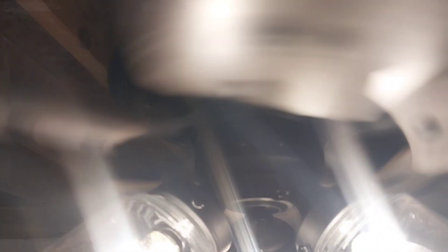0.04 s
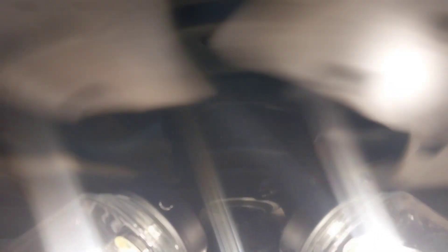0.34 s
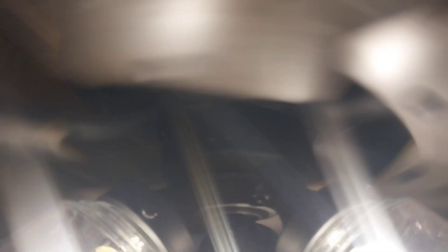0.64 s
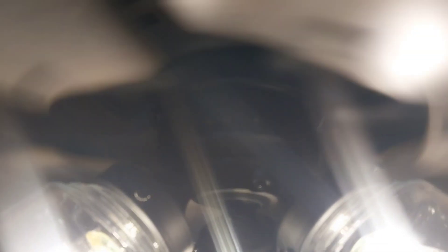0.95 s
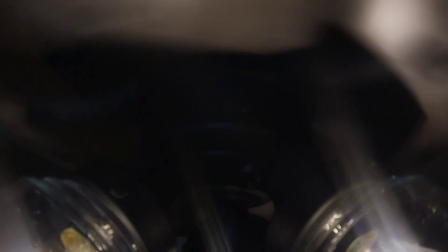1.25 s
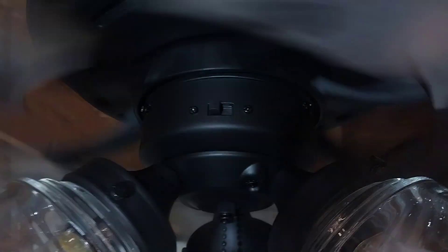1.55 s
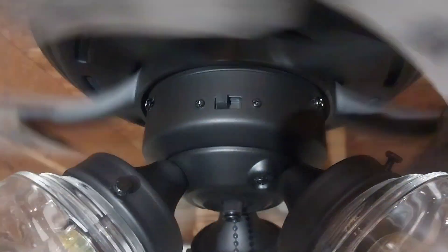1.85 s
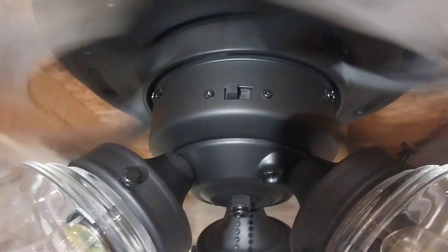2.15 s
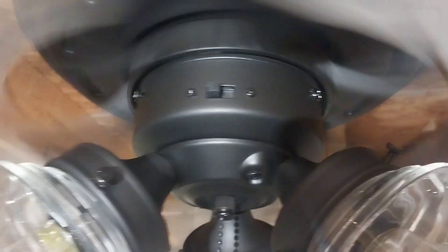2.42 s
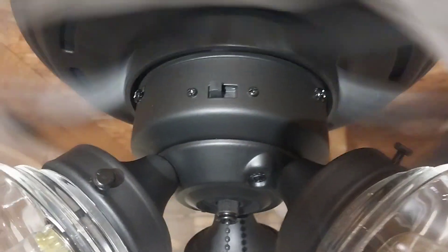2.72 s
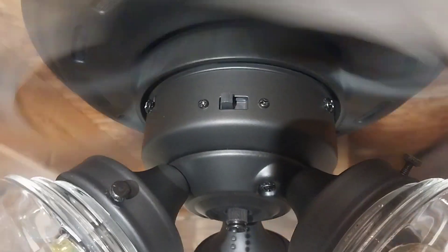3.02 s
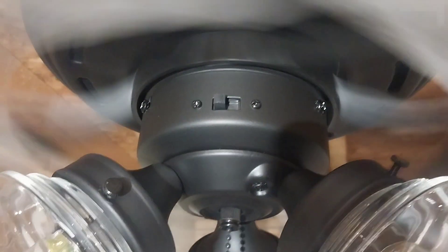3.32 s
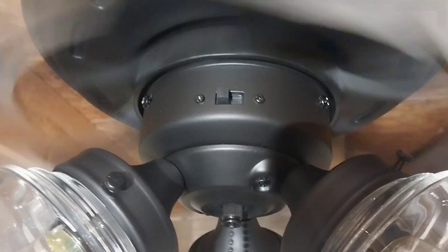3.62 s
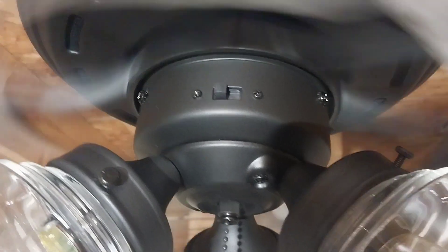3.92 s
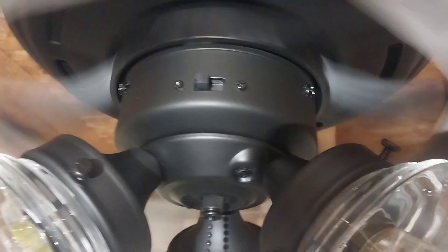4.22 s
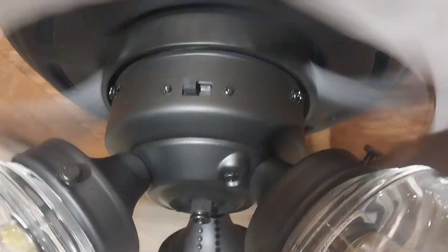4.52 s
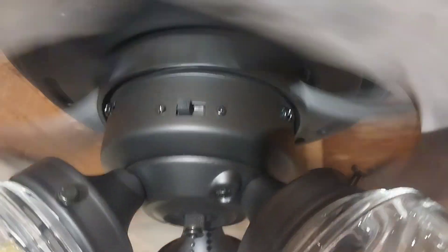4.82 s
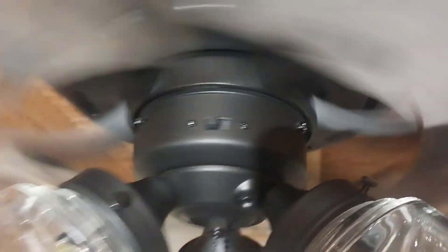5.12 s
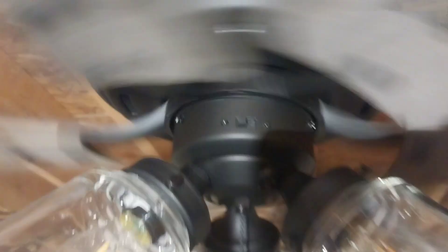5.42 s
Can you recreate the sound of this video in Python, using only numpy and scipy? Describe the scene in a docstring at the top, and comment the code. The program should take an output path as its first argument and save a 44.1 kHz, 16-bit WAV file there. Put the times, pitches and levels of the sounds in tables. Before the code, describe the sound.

A ceiling fan whooshes softly close by while its pull chains snap: two sharp clicks, then six evenly spaced ones.

```python
"""A small wooden room, a ceiling fan turning just above a hand-held microphone. The blades swish once a
turn while gusts buffet the ports. One pull-chain switch snaps the lamps off and on; a second chain is
pulled six times, each pull ticking and catching before it snaps, and the blades begin to slow. Beads
scrape and jingle, the metal housing rings faintly, and the room answers the switches. Underneath lie
a thin motor whine, a steady hiss and, at the start, a few bumps and a rustle of the hand."""
import sys
import numpy as np
from scipy import signal
from scipy.fft import rfft, irfft, next_fast_len
from scipy.io import wavfile
from scipy.ndimage import uniform_filter1d

SR = 44100
rng = np.random.default_rng(int(sys.argv[2]) if len(sys.argv) > 2 else 0)


def unload_wav(signal):
    """Save mono or channel-first audio to the path in sys.argv[1] as 16-bit WAV at rate SR, clipped to [-1, 1]."""
    wavfile.write(
        sys.argv[1],
        SR,
        np.round(np.clip(np.atleast_2d(signal).T, -1, 1) * 32767).astype(np.int16),
    )


N = 249606
TIME = np.arange(N) / SR
FFT_SIZE = next_fast_len(N, real=True)
COAST_S = 3.5  # just after the second pull, the whine is gone and the blades start to slow

# strength of the downdraught at the microphone: time_s, level_db
DOWNDRAUGHT = [(0.0, -49), (0.69, -56), (1.09, -53.5), (1.78, -57), (2.11, -55.5), (4.54, -60.5),
               (4.73, -64.5), (5.01, -63), (5.23, -65.5), (5.66, -59.5)]
# the strongest gusts: peak_s, length_s, thump_db, whoosh_db
GUSTS = [(0.026, 0.031, -35, -42.5), (0.162, 0.045, -39.5, -62), (0.217, 0.056, -41, -59.5),
         (0.564, 0.064, -47, -48), (1.16, 0.081, -47, -54.5), (1.334, 0.059, -48.5, -47),
         (1.445, 0.054, -48.5, -61), (2.097, 0.078, -41, -50), (2.243, 0.045, -57, -58),
         (2.575, 0.033, -42.5, -59.5), (2.645, 0.087, -50.5, -51), (3.205, .11, -45, -46),
         (3.304, 0.061, -50.5, -69), (3.796, 0.056, -50.5, -47), (4.07, 0.052, -58, -74),
         (4.469, 0.051, -48, -56.5), (4.866, 0.067, -45.5, -58.5), (5.029, 0.063, -52, -61.5),
         (5.65, 0.094, -47.5, -54.5)]
# four bands of moving air, from rumble up to sizzle: frequency_hz, density_db
BUFFET_COLOUR = [(15, -24.5), (30, -14.5), (45, -1.5), (60, 4.5), (80, -2.5), (103, 3.5), (135, -5),
                 (190, -17), (400, -46), (900, -80)]
WHOOSH_COLOUR = [(70, -35.5), (125, -7), (160, -2), (197, 3), (250, -2), (300, -6), (370, -16), (450, -20),
                 (650, -30), (1500, -84)]
RUSH_COLOUR = [(200, -31.5), (350, -4), (450, 3), (550, -4.5), (700, -15), (900, -17.5), (1500, -38),
               (4000, -52.5)]
SIZZLE_COLOUR = [(300, -5), (900, -0.5), (1400, 0), (2200, -3.5), (3800, -12.5), (5200, -4.5), (6600, 3.5),
                 (7300, -14), (8400, -21.5), (10000, -13.5), (12800, -9), (15700, -14)]
# how alike the two microphone ports sound: frequency_hz, correlation
PORT_LIKENESS = [(30, .24), (60, .24), (125, .43), (250, .58), (600, .55), (2000, .25), (8000, .1)]

# snaps of the two switches: time_s, level_db, decay_s, brightness_db, knock_db, pitch_hz
SPEED_SNAPS = [(3.1774, -15.5, .0032, 4, -1, 6390), (3.4509, -16.5, 0.0036, 1, 6, 6600),
               (3.7567, -19.5, 0.0059, 6.5, 3.5, 6920), (4.0169, -13, 0.0021, -3, 3, 5690),
               (4.301, -18.5, 0.0041, 0, -.5, 6400), (4.5666, -17.5, 0.0058, 1.5, 3.5, 5600)]
LAMP_SNAPS = [(1.2840, -53, 0.0042, -16, 2.5, 6700), (1.3145, -54.5, 0.0099, -4, 0, 6500),
              (1.3262, -7, 0.0033, 4.5, -4, 6350), (1.5395, -21, 0.0028, -1, 7, 6700)]
# the pawl's light tick and the firmer catch ahead of each speed snap: time_s, level_db
PAWL_TICKS = [(3.1248, -49.5), (3.3667, -41), (3.7127, -42.5), (3.9364, -43.5), (4.2611, -37),
              (4.4785, -40)]
CATCHES = [(3.162, -36.5), (3.4225, -32.5), (3.746, -37), (3.9929, -33.5), (4.290, -33.5), (4.5335, -32.5)]
# two alternating strokes, one grinding into a hollow catch, one crisp; the scrape, then the catch:
# start_before_snap_s, end_before_snap_s, scrape_db, rise_s, decay_s, brightness_db, knock_db
STROKES = [(0.076, 0.011, -69.5, .0028, .0065, 4, 12.5), (0.066, .025, -61, .0005, .0035, 1.5, 0)]
# tone of each switch's contacts: frequency_hz, density_db
SPEED_COLOUR = [(400, -27), (800, -20.5), (1250, -14), (1700, -21.5), (2400, -17.5), (3500, -18),
                (4400, -10), (6500, -0.5), (7300, -7), (8200, -19.5), (9400, -12), (10300, -5), (12200, 2),
                (15600, -8.5)]
LAMP_COLOUR = [(200, -31), (600, -24.5), (1050, -17), (1800, -29.5), (2650, -22.5), (3900, -24),
               (5400, -9.5), (6600, -4.5), (7900, -16), (9200, -7), (10000, -2), (11500, 1.5), (13200, 2.5),
               (15800, -14)]
# hollow modes of each switch body: pitch_hz, level_db, t60_s
SPEED_BODY = [(815, -10.5, 0.042), (1106, -5.5, 0.029), (1261, -11, 0.086), (2467, -10.5, 0.051),
              (2930, -13.5, 0.011)]
LAMP_BODY = [(704, -3, 0.05), (1048.6, 4.5, 0.038), (2580, -4, .018)]
# the pendant jingles as the chain is let go: start_s, level_db, t60_s
JINGLES = [(4.020, -42.5, 0.38), (4.0846, -30.5, 0.023), (4.570, -44.5, 0.2)]
# metal resonances of the chain's pendant and the motor's shell: pitch_hz, half_width_hz, level_db
PENDANT_RESONANCES = [(5710, 170, 11), (6600, 300, -8)]
HOUSING_RESONANCES = [(1460, 30, 3.5)]

# tone of the first reflections: frequency_hz, level_db
SCATTER_COLOUR = [(500, 10), (1200, 1.5), (3000, 5), (6000, -4.5), (9000, -8), (11500, -4.5), (14500, -7.5)]
# length of the room's tail: frequency_hz, t60_s
ROOM_T60 = [(200, .45), (1400, 0.58), (3000, 0.59), (6000, 0.52), (9000, 0.26), (12000, 0.33),
            (16000, 0.33)]
# soft bumps of the hand: time_s, level_db, decay_s
BUMPS = [(.069, -46, 0.0045), (0.148, -33, 0.0028), (0.310, -34.5, 0.0052)]
# the hard click of the first two bumps, then a few faint, dry ticks:
# time_s, level_db, decay_s, brightness_db, knock_db, pitch_hz
DRY_CLICKS = [(.0685, -47, 0.0012, -2, 24.5, 6400), (.1482, -48, 0.00081, 6, 20, 6396),
              (2.882, -58.5, 0.0013, -1, -6, 6400), (2.9545, -55.5, 0.0027, -16.5, -7, 5900),
              (5.378, -64.5, 0.0014, -18.5, 6.5, 5000)]
# fingers sliding on the microphone's case: time_s, level_db
RUSTLE_ENVELOPE = [(0, -88), (.08, -74.5), (.25, -75), (.36, -75), (.45, -100), (.5, -130)]
# tone of the bumps, the fingers and the microphone's hiss: frequency_hz, density_db
BUMP_COLOUR = [(80, -11.5), (250, -10), (400, -2), (600, -15), (900, -44), (2500, -54), (8000, -62)]
RUSTLE_COLOUR = [(800, -15), (3500, -19), (4900, -0.5), (5800, -8.5), (8000, -23.5), (13000, -13),
                 (16000, -24)]
HISS_COLOUR = [(200, 9.5), (1000, 8), (3500, -4), (6500, -1.5), (8300, -10), (10000, -3), (12800, 4.5),
               (15700, -3.5)]


def fan():
    """Eddies thump the ports; the blades whoosh and sizzle, all fluttering with the same turbulence."""
    eddies, lumps, swell = wander(rate_hz=190), wander(rate_hz=12), blade_swish()
    thump, puff = gusts()
    buffeting = airflow(swell, db=-57.5, follows=0.63, swish_db=0) * amp(2.2 * lumps)
    whooshing = airflow(swell, db=-56.5, follows=0.82, swish_db=2.5) * amp(0.96 * lumps)
    rushing = airflow(swell, db=-75, follows=2, swish_db=2)
    sizzling = airflow(swell, db=-86, follows=1.27, swish_db=9)
    buffet = stereo_noise(BUFFET_COLOUR) * np.hypot(buffeting, thump) * amp(1.4 * eddies)
    whoosh = stereo_noise(WHOOSH_COLOUR) * np.hypot(whooshing, puff) * amp(1.1 * eddies)
    rush = stereo_noise(RUSH_COLOUR) * rushing * amp(1.2 * eddies)
    sizzle = stereo_noise(SIZZLE_COLOUR) * sizzling * amp(0.21 * eddies)
    return buffet + whoosh + rush + sizzle


def blade_swish(turn_hz=2.55, first_swish_s=0.16, slowing_hz_per_s=0.25, sharpness=3):
    """A swell from zero to one and back each turn, spreading out as the blades coast."""
    speed_hz = turn_hz - slowing_hz_per_s * np.maximum(TIME - COAST_S, 0)
    turns = np.cumsum(speed_hz) / SR - turn_hz * first_swish_s
    return abs(np.cos(np.pi * turns)) ** sharpness


def airflow(swell, db, follows, swish_db):
    """Fader for one band of air: it rides the downdraught and lifts by swish_db on each swish."""
    draught_db = np.interp(TIME, *np.transpose(DOWNDRAUGHT))
    return amp(db + follows * (draught_db - draught_db.mean()) + swish_db * swell)


def gusts():
    """Each gust swells and fades in a bell curve; gives the envelopes of thump and whoosh."""
    out = np.zeros((2, N))
    for peak_s, length_s, thump_db, whoosh_db in GUSTS:
        near = abs(TIME - peak_s) < 2 * length_s
        bell = np.exp(-(2 * (TIME[near] - peak_s) / length_s) ** 2)
        out[:, near] += amp([[thump_db], [whoosh_db]]) * bell
    return out


def speed_switch(tick_decay_s=0.004, tick_bright_db=-8, tick_knock_db=-4.5, pawl_hz=6250):
    """Each pull ticks the pawl, catches, then snaps."""
    switch = SPEED_COLOUR, SPEED_BODY
    ticks = [(s, db, tick_decay_s, tick_bright_db, tick_knock_db, pawl_hz) for s, db in PAWL_TICKS]
    out = clicks(ticks, *switch, body_db=-28.5, rise_s=0.0005, likeness=0.14, catch_db=6)
    for kind, (*_, rise_s, decay_s, bright_db, knock_db) in enumerate(STROKES):
        catches = [(s, db, decay_s, bright_db, knock_db, pawl_hz)
                   for s, db in CATCHES[kind::len(STROKES)]]
        out += clicks(catches, *switch, body_db=-24.5, rise_s=rise_s, likeness=0.14, catch_db=7)
    return out + clicks(SPEED_SNAPS, *switch, body_db=-25, rise_s=0.00084, likeness=0.2, catch_db=8)


def lamp_switch():
    """Two faint ticks lead into a hard snap off, then a lighter snap on."""
    return clicks(LAMP_SNAPS, LAMP_COLOUR, LAMP_BODY,
                  body_db=-33, rise_s=0.0003, likeness=0.22, catch_db=2.5)


def clicks(rows, colour, body, body_db, rise_s, likeness, catch_db):
    """Each click layers a short rattle of contacts over a hollow clack."""
    out = np.zeros((2, N))
    for s, db, decay_s, bright_db, knock_db, catch_hz in rows:
        contacts = rattle(colour, decay_s, rise_s, likeness, bright_db, knock_db, catch_hz, catch_db)
        add(out, s - 0.01, amp(db) * contacts)
        add(out, s, amp(db + knock_db + body_db) * clack(body))
    return out


def rattle(colour, decay_s, rise_s, likeness, bright_db=0, knock_db=0, catch_hz=6400, catch_db=0):
    """A tight burst of contact noise, coloured by the body it strikes; it crests 10 ms in."""
    size = 4096
    t = np.arange(size) / SR - 0.01
    envelope = np.exp(np.minimum(t / rise_s, -t / decay_s))
    shared, *sides = rng.standard_normal((3, size))
    contacts = envelope * (np.sqrt(likeness) * shared + np.sqrt(1 - likeness) * np.array(sides))
    hz = abs(np.fft.fftfreq(size, 1 / SR))
    top = (1 + np.tanh((hz - 8500) / 1500)) / 2  # a sharper contact feeds the upper resonances
    low = 1 / (1 + (hz / 3200) ** 4)  # a heavier one knocks on the hollow switch cup
    catch = np.exp(-((hz - catch_hz) / 520) ** 2)  # the spring catch has a pitch of its own
    gain = amp(read_curve(colour, hz) + bright_db * top + knock_db * low + catch_db * catch)
    body = np.exp(np.conj(signal.hilbert(np.log(gain))))  # minimum phase keeps the attack crisp
    struck = np.fft.ifft(np.fft.fft(contacts) * body).real
    return unit_rms(struck) * np.sqrt(np.mean(envelope ** 2))


def clack(body, spread_db=2, detune=0.023, attack_s=0.0007):
    """A blow rings the hollow switch body, a little differently each time."""
    t = np.arange(6000) / SR
    modes = np.zeros((1, len(t)))
    for hz, db, t60_s in body:
        louder, sharper = rng.standard_normal(2)
        tone = np.sin(2 * np.pi * hz * (1 + detune * sharper) * t)
        modes += amp(db + spread_db * louder) * die_away(t, t60_s) * tone
    return modes * (1 - np.exp(-t / attack_s))


def bead_chain():
    """The beads scrape through their eyelet on each pull; now and then the pendant jingles."""
    jingles, pulling = np.zeros((2, N)), np.zeros(N)
    for s, db, t60_s in JINGLES:
        add(jingles, s, amp(db) * metal_ring(PENDANT_RESONANCES, t60_s))
    for pull, (snap_s, *_) in enumerate(SPEED_SNAPS):
        start_before_s, end_before_s, db, *_ = STROKES[pull % len(STROKES)]
        pulling += amp(db) * ((TIME > snap_s - start_before_s) & (TIME < snap_s - end_before_s))
    scraping = uniform_filter1d(pulling, size=600) * amp(2.7 * wander(rate_hz=150))
    return jingles + scraping * unit_rms(stereo_noise(SPEED_COLOUR))


def housing(send_db=-50):
    """Every snap of the speed switch sets the motor's metal shell ringing faintly."""
    out = np.zeros((2, N))
    for s, snap_db, *_ in SPEED_SNAPS:
        add(out, s, amp(snap_db + send_db) * metal_ring(HOUSING_RESONANCES, t60_s=0.64))
    return out


def metal_ring(resonances, t60_s, attack_s=0.003, size=32768):
    """Clusters of close metal modes beat against each other as they die."""
    hz, t = np.fft.rfftfreq(size, 1 / SR), np.arange(size) / SR
    gain = sum(amp(db) / (1 + ((hz - centre) / width) ** 2) for centre, width, db in resonances)
    phases = np.exp(2j * np.pi * rng.random((2, len(hz))))
    return unit_rms(irfft(gain * phases)) * die_away(t, t60_s) * (1 - np.exp(-t / attack_s))


def room(sound, early_db, early_t60_s, late_db, build_s=0.008, size=32768):
    """Quick scatter from lamp shades, blades and ceiling, then the longer tail of the room."""
    hz, t, (early, late) = signal.stft(rng.standard_normal((2, 2, size)), SR, nperseg=256)
    scatter_tone = amp(early_db + read_curve(SCATTER_COLOUR, hz)[:, None])
    scatter = scatter_tone * die_away(t, early_t60_s) / np.sqrt(early_t60_s)
    tail = amp(late_db) * die_away(t, read_curve(ROOM_T60, hz)[:, None])
    reflections = signal.istft(early * scatter + late * tail, SR, nperseg=256)[1][:, :size]
    fade_in = np.clip(np.arange(size) / SR / build_s, 0, 1) ** 2
    response = reflections * fade_in * np.sqrt(2 * np.log(1000) / SR)
    return signal.fftconvolve(sound, response, axes=1)[:, :N]


def hand_bumps(shudder_db=-17.5, shudder_s=0.017):
    """Dull bumps of the hand on the microphone's case, which shudders on after each."""
    bumps, shudder = np.zeros((2, N)), np.zeros(N)
    for s, db, decay_s in BUMPS:
        add(bumps, s - 0.01, amp(db) * rattle(BUMP_COLOUR, decay_s, rise_s=0.00027, likeness=0.74))
        shudder += amp(db + shudder_db) * (TIME > s) * np.exp(-abs(TIME - s) / shudder_s)
    return bumps + shudder * stereo_noise(RUSH_COLOUR)


def dry_clicks():
    """The hard click of the first two bumps on the microphone, then a few faint, dry ticks."""
    return clicks(DRY_CLICKS, SPEED_COLOUR, SPEED_BODY,
                  body_db=-39, rise_s=0.0001, likeness=0.37, catch_db=1.5)


def finger_rustle():
    """A short, grainy slide of skin on plastic."""
    slide = amp(np.interp(TIME, *np.transpose(RUSTLE_ENVELOPE)))
    return stereo_noise(RUSTLE_COLOUR) * slide * amp(2 * wander(rate_hz=100))


def motor_whine(pitch_hz=1077, db=-87, fade_s=0.05):
    """The motor's faint, wavering whine, fading out as the blades start to coast."""
    cycles = np.cumsum(pitch_hz + 6 * wander(rate_hz=9.7)) / SR
    running = np.clip((COAST_S - TIME) / fade_s, 0, 1)
    waver_db = 2.1 * np.tanh(wander(rate_hz=5.2))
    return amp(db + waver_db) * running * np.sin(2 * np.pi * cycles)


def microphone_hiss(db=-80.5):
    """The microphone's steady noise floor."""
    return amp(db) * stereo_noise(HISS_COLOUR)


def stereo_noise(colour):
    """Coloured noise at two partly alike ports; their mean has an rms of one."""
    hz = np.fft.rfftfreq(FFT_SIZE, 1 / SR)
    mid, side = rng.standard_normal((2, 2 * len(hz))).view(complex) * amp(read_curve(colour, hz))
    likeness = read_curve(PORT_LIKENESS, hz)
    side = side * np.sqrt((1 - likeness) / (1 + likeness))
    pair = irfft(np.array([mid + side, mid - side]), FFT_SIZE)[:, :N]
    return pair / pair.mean(0).std()


def wander(rate_hz):
    """Smooth random modulation with an rms of one."""
    hz = np.fft.rfftfreq(FFT_SIZE, 1 / SR)
    spectrum = rfft(rng.standard_normal(FFT_SIZE)) / (1 + (hz / rate_hz) ** 4)
    return unit_rms(irfft(spectrum, FFT_SIZE)[:N])


def die_away(t, t60_s):
    """A decay that falls 60 dB in t60_s."""
    return np.exp(-np.log(1000) * t / t60_s)


def amp(db):
    """Decibels to gain."""
    return 10 ** (np.asarray(db) / 20)


def unit_rms(x):
    """Scales to an rms of one."""
    return x / np.sqrt(np.mean(x ** 2) + 1e-30)


def read_curve(points, hz):
    """Reads a table along a logarithmic frequency axis."""
    point_hz, values = np.transpose(points)
    return np.interp(np.log(hz + 1), np.log(point_hz + 1), values)


def add(mix, start_s, sound):
    """Drops a sound into the stereo mix."""
    part = mix[:, max(round(start_s * SR), 0):][:, :sound.shape[1]]
    part += sound[:, :part.shape[1]]


def scene():
    """The fan and its pull chains over handling noise and hiss; only the two switches feed the room."""
    lamp, speed, ticks = lamp_switch(), speed_switch(), dry_clicks()
    reverb = room(lamp, early_db=-3.5, early_t60_s=0.14, late_db=-9)
    reverb += room(speed, early_db=-6.5, early_t60_s=0.19, late_db=-12)
    switches = lamp + speed + bead_chain() + housing() + reverb
    return fan() + switches + motor_whine() + hand_bumps() + ticks + finger_rustle() + microphone_hiss()


def record(dry):
    """Clips the mix at full scale, then cuts the very top of the treble."""
    lowpass = signal.firwin(255, cutoff=15900, window=("kaiser", 8), fs=SR)
    return signal.oaconvolve(np.clip(dry, -1, 1), lowpass[None], "same")


dry = scene()
out = record(dry)
unload_wav(out)
```